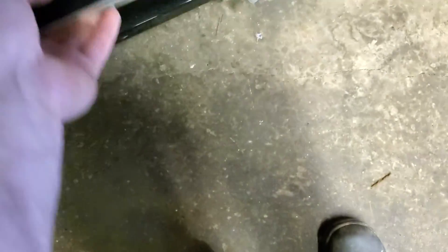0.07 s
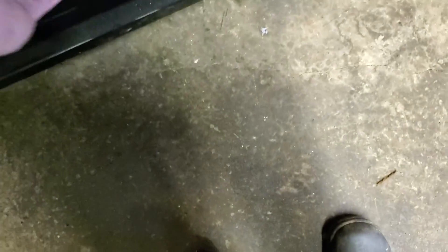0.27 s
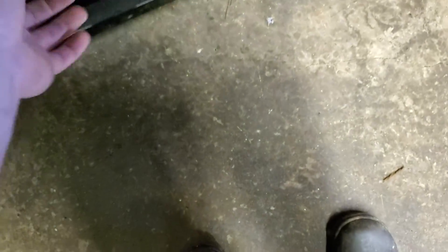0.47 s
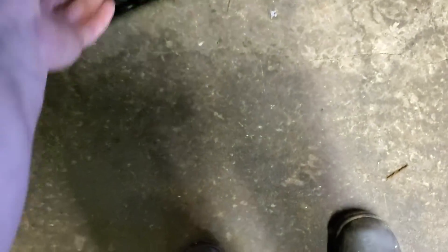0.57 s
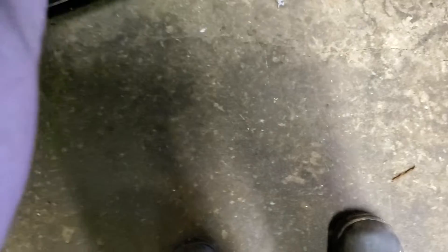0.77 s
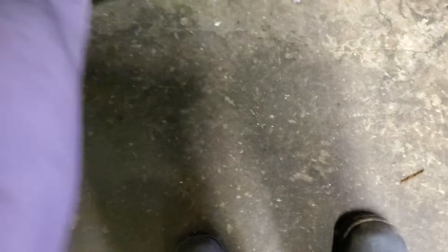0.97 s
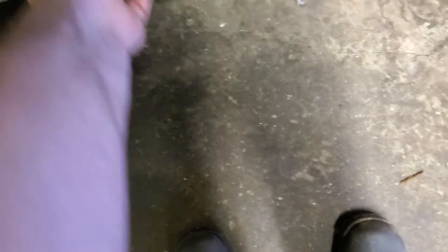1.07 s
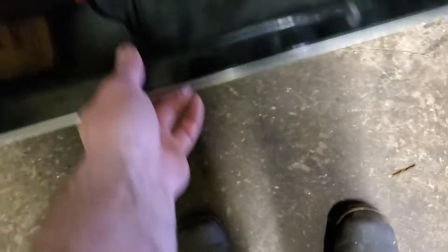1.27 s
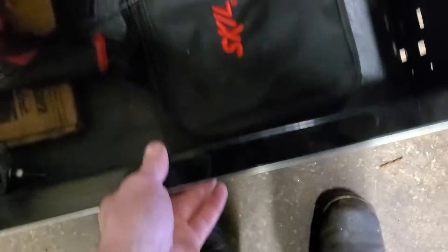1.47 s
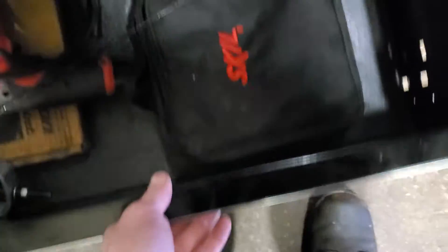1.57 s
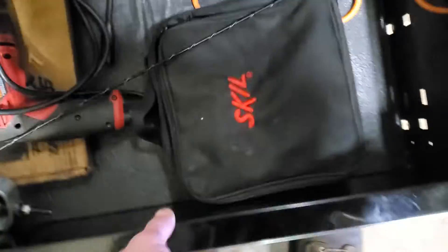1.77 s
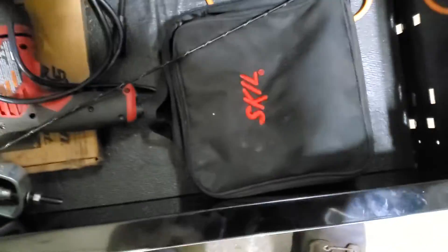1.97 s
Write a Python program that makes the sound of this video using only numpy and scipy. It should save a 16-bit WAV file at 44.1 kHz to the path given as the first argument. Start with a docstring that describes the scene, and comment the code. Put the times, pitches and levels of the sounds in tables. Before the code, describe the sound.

A steel tool cart drawer clicks and slams shut, leaving the panels booming. A handle rattles, then another drawer unlatches, rolls out and hits its stop with a clack, jostling tools. Heard close by in a garage.

```python
"""Steel drawers of a tool cart

Heard from close by in a garage, one drawer rolls in, trips its catch and slams home, leaving the
cabinet's panels booming. Another is unlatched, rolls out on ball-bearing slides and hits its stop with
a clack; the tools inside shift. Each impact excites damped modes of the steel: the distinct ones ring
as tones, the crowded ones merge into decaying noise, and the garage adds its reverberation."""
import sys
import numpy as np
from scipy import signal
from scipy.fft import rfft, irfft, next_fast_len
from scipy.io import wavfile

SR = 44100
rng = np.random.default_rng(int(sys.argv[2]) if len(sys.argv) > 2 else 0)


def dump(signal):
    """Clip the signal to [-1, 1] and save it as 16-bit WAV at the path in sys.argv[1]."""
    limited = np.clip(np.atleast_2d(signal).T, -1, 1)
    pcm = np.round(limited * 32767).astype(np.int16)
    wavfile.write(sys.argv[1], SR, pcm)


N = 89214
TIME = np.arange(N) / SR
BAND_HZ = 1000 * 2 ** (np.arange(-15, 13) / 3)
SECOND_DRAWER_S = 1.0

# Impacts of small steel parts: part, start_s, level_db, bass_db, mids_db, treble_db, attack_s, base_t60_s
CLICKS = [("rail", 0.081, -65.5, 10, -7.5, 9.5, .001, 0.045),
          ("catch", 0.2527, -27.5, 0.5, -0.8, -2.3, 0.0031, 0.14),
          ("bolt", 0.3219, -29.5, -1, 1, -1, 0.0033, 0.13),
          ("rail", 0.3285, -39.5, 0, 0, 13, 0.0011, 0.058), ("rail", 0.3540, -22.5, 4, -1, 0, 0.0015, 0.1),
          ("rail", 0.37, -37, 4, -11, 1, .002, 0.25), ("handle", 0.811, -50, -20, -10, -18, .006, .08),
          ("handle", 0.8227, -39.5, -21, -6.5, -4.5, 0.0022, 0.16),
          ("handle", 0.841, -37, -18, -5.5, -11.5, 0.003, 0.13),
          ("rail", 0.911, -61, -4, 9, 3, 0.0012, 0.049), ("rail", 1.328, -43, -10, 0, -13, 0.0025, 0.058),
          ("latch", 1.3925, -32, 7.8, -1.6, 5.1, 0.0053, 0.099),
          ("rail", 1.447, -50, -4, 7, -8, 0.0036, .12), ("rail", 1.678, -69, -10, -4, 11.5, 0.004, 0.044),
          ("rail", 1.693, -73, -1, -10, 18, .001, 0.024), ("rail", 1.822, -26, 15, 5, 3, 0.0026, 0.055),
          ("rail", 1.972, -53, -8, -10, 15.4, 0.014, 0.25),
          ("rail", 1.9985, -48.5, -8, -8, 20, .001, 0.023)]
# Impacts on the drawer boxes: start_s, level_db, bass_db, mids_db, treble_db, attack_s, base_t60_s
KNOCKS = [(0.125, -57, 14, -4, -17, 0.0017, 0.43), (0.3098, -30.5, -1, -6, -12, 0.0012, 0.17),
          (0.3629, -21, 1, -1.5, 1.5, 0.0027, 0.19), (0.392, -33, 7.5, -1, -1, 0.0018, 0.33),
          (0.424, -38.5, 8.5, 5, -6, .005, 0.22), (0.745, -55, 6.5, -2, -2, .003, 0.29),
          (1.141, -55.5, 15.5, -10, -15, 0.0089, 0.41), (1.285, -53, 7, -1, -16, 0.0013, 0.16),
          (1.406, -39.5, 10.5, -4, -8, 0.00087, 0.21), (1.8015, -23, -5.5, 2.5, -1, 0.0021, 0.17),
          (1.811, -31.5, 3, 5.5, -9, 0.0017, .1), (1.836, -32, 5, -1.5, -2, 0.0013, 0.58),
          (1.873, -32.5, 0, 0, -3.5, 0.0038, 0.45), (1.908, -41.5, 5, -5, -11, .004, 0.73),
          (1.977, -45, 14, 2.5, 6, 0.0016, 0.14)]
# Third-octave spectra of the slides and the garage: band_hz, rolling_db, hush_db, reverb_db
SPECTRA = [(25, -18, -58, -15), (39.7, -23, -64, -5), (64.3, -2.5, -52.5, 1.5), (106, 0.5, -52, -1.5),
           (196, -3.5, -50, -5.5), (405, 4, -58.5, -18), (677, 2, -57.5, -20.5), (1200, -2, -61, -22),
           (2240, -4.5, -60, -17), (3870, -8.5, -65, -20), (6460, -18, -74.5, -26.5),
           (10000, -17.5, -73, -29), (15000, -27, -79, -39)]
# Coherence of the left and right channels: frequency_hz, correlation
COHERENCE = [(60, 0.98), (150, 1), (380, 0.89), (950, 0.36), (2400, 0), (15000, 0.03)]


def clatter(bands):
    """Modal overlap: crowded modes merge into noise, which flutters as loose parts chatter."""
    # Dense ringing of the steel per third octave: band_hz, click_db, knock_db, t60_factor
    steel = [(25, -29, -21, 1.3), (50, -27, -16, 1.5), (107, -12.5, -10, 1), (164.8, -14.5, -10, 0.56),
             (244, -11.5, -6.5, 1), (433, -11.5, -4, 0.8), (780, -8, -3, 0.92), (1570, -5, -.5, 0.85),
             (3430, 2.5, -1.5, 1), (6300, -4, -4.5, 0.7), (10000, -0.5, -5.5, 0.83), (15000, -4, -4, 0.59)]
    chatter_db = 1.23 * flicker(hz=333.7)
    clicks = [blow for part, *blow in CLICKS]
    out = 0
    for hz, noise in zip(BAND_HZ, bands):
        click_db, knock_db, t60_factor = at_hz(steel, hz)
        reverb_db = at_hz(SPECTRA, hz)[2]
        power = band_power(clicks, hz, click_db, t60_factor, reverb_db)
        power += band_power(KNOCKS, hz, knock_db, t60_factor, reverb_db)
        out += np.sqrt(power) * noise
    shaking = sum(strike(start, attack, 2 * t60) for start, *_, attack, t60 in clicks + KNOCKS)
    return out * from_db(np.minimum(shaking, 1) * chatter_db)


def band_power(blows, hz, band_db, t60_factor, reverb_db):
    """Incoherent addition: the steel's ring and the garage's reverberation sum as powers."""
    power = np.zeros(N)
    reverb = (from_db(reverb_db) * strike(0, attack=0.0076, t60=0.8)) ** 2
    for start, db, *tone_db, attack, t60 in blows:
        first = int(start * SR)
        ring = strike(0, attack, t60 * t60_factor) ** 2
        tail = ring + reverb * t60 / 0.14   # a longer ring feeds the room more energy
        power[first:] += from_db(db + band_db + impact_colour(hz, *tone_db)) ** 2 * tail[:N - first]
    return power


def panels():
    """Flexural vibration: sheet steel booms; a hand reaching for the next drawer damps the first booms."""
    # Low modes of the broad panels: start_s, pitch_hz, level_db, attack_s, free_t60_s
    booms = [(0.313, 83, -25, 0.0077, 0.29), (0.36, 42.2, -22, 0.011, 0.22),
             (0.3676, 80.4, -5.5, 0.0079, 1.43), (0.38, 86.5, -15, 0.0078, 0.057),
             (0.752, 87.7, -22, 0.0055, 0.46), (0.98, 93.7, -39, 0.023, 0.89),
             (1.407, 263, -18.5, 0.0025, 0.076), (1.416, 98.5, -19.5, 0.0043, 0.27),
             (1.803, 63.5, -14, 0.019, 0.18), (1.835, 38.4, -24, 0.017, .3),
             (1.874, 106, -11.5, .012, 0.35), (1.882, 204.5, -19.5, 0.03, 0.44),
             (1.831, 301, -10, 0.005, 0.043), (1.948, 52, -27.5, 0.038, 0.36)]
    hand_damping = np.exp(-np.log(1000) * np.maximum(TIME - 0.78, 0) / 0.75)
    out = 0
    for start, hz, db, attack, t60 in booms:
        swing = from_db(db) * strike(start, attack, t60) * np.sin(2 * np.pi * hz * (TIME - start))
        out += swing * (hand_damping if start < SECOND_DRAWER_S else 1)
    return out


def drawer_boxes():
    """Free vibration: each knocked drawer rings at its own natural frequencies."""
    # Modes of the closing and of the opening drawer: pitch_hz, level_db, t60_s
    closing_modes = [(254.4, -5.5, 0.34), (362.3, -5.5, 0.23), (390.4, 1.5, 0.3), (451, -4, 0.25),
                     (490, -11, 0.38), (628, -4.5, 0.33), (707, -9.5, 0.29), (1438, -2.5, 0.12),
                     (1684, -5.5, .24), (1770, -3.5, 0.19), (2190, -3, 0.11)]
    opening_modes = [(325.8, -1.5, 0.18), (407, -3, 0.2), (918, 3, 0.13), (1142, -1, 0.22),
                     (1295, -4, 0.18), (1386, 4, 0.2), (1465, 5, 0.1), (1563, -2.5, 0.19), (1830, -5, .13),
                     (2045, -1, .11), (2230, 3, 0.1), (3190, -2, 0.21), (3493, -3, 0.15), (6626, -10, 0.2),
                     (7305, -10, 0.17)]
    closing = [knock for knock in KNOCKS if knock[0] < SECOND_DRAWER_S]
    opening = [knock for knock in KNOCKS if knock[0] >= SECOND_DRAWER_S]
    slam = modal_ring(with_rebounds(closing, count=5), closing_modes + minor_modes(), gain_db=-1)
    clack = modal_ring(with_rebounds(opening, count=5), opening_modes + minor_modes(), gain_db=-0.5)
    return slam + clack


def minor_modes(count=36):
    """Damping grows with frequency: of a drawer's weak, scattered modes the high ones die first."""
    octaves = rng.uniform(-1.5, 2.9, count)
    level_db = -13.5 - 0.5 * octaves
    t60_s = 0.21 * 2 ** (-.15 * octaves)
    return list(zip(1000 * 2 ** octaves, level_db, t60_s))


def locking_parts():
    """Impact excitation: small, stiff parts ring briefly at high natural frequencies."""
    # Modes of each part: pitch_hz, level_db, t60_s
    catch = [(1349, 0, .15), (2260, 2, .08), (2906, -2, .11), (3480, 1, .13), (3666, 2, .16), (4075, 3, .1),
             (4300, 2, .1)]
    bolt = [(726, 2.5, 0.15), (1020, 4, .12), (2201, 3, 0.087), (3499, 13, 0.089), (4446, 3, 0.093),
            (6939, -10, .06)]
    handle = [(945, 2, .15), (1916, 1, .15), (2100, 1, .17), (2400, 1, .14), (3203, 2.5, .12),
              (3692, 1.5, .14), (3950, -2, .17)]
    latch = [(1787, -3, 0.19), (2000, -0.5, 0.15), (2770, 0, .08), (2940, 0, .06), (4247, -5, .1),
             (6500, -7, .1), (6760, -6, .1)]
    out = 0
    for name, modes in dict(catch=catch, bolt=bolt, handle=handle, latch=latch).items():
        blows = [blow for part, *blow in CLICKS if part == name]
        out += modal_ring(blows, modes, gain_db=-1)
    return out


def loose_tool():
    """Free vibration: a small steel tool, jolted in the drawer, rings in the high treble."""
    # Jolts of the tool: start_s, level_db
    jolts = [(1.823, -45), (1.872, -50), (1.939, -47)]
    # Modes of the tool: pitch_hz, level_db, t60_s
    modes = [(8480, -10, .25), (14900, 7.5, 0.3), (14965, 4, .2), (15100, 4, 0.35), (15530, 1, .18)]
    blows = [(start, db, 0, 0, 0) for start, db in jolts]   # flat excitation spectrum
    return modal_ring(with_rebounds(blows, count=4), modes, gain_db=0)


def with_rebounds(blows, count, mean_delay_s=.035, loss_db=8, fade_db_per_s=101):
    """Inelastic collision: loose contents land again after each blow, the later the weaker."""
    impacts = list(blows)
    for start, db, *rest in blows:
        impacts += [(start + delay, db - loss_db - fade_db_per_s * delay, *rest)
                    for delay in rng.exponential(mean_delay_s, count) if start + delay < TIME[-1]]
    return impacts


def modal_ring(blows, modes, gain_db, spread_db=1.5):
    """Superposition: every blow kicks every damped mode; high modes differ in phase left and right."""
    out = np.zeros((2, N))
    starts, blow_db, *tone_db = np.transpose(blows)[:5]
    for hz, mode_db, t60 in modes:
        phase_gap = np.arccos(at_hz(COHERENCE, hz)[0]) * rng.choice([-1, 1])
        strength_db = blow_db + mode_db + gain_db + impact_colour(hz, *tone_db)
        strength_db += spread_db * rng.standard_normal(len(starts))
        phases = np.exp(2j * np.pi * rng.random(len(starts)))
        kicks = np.zeros(N, complex) + 1e-18
        kicks[(starts * SR).astype(int)] += from_db(strength_db) * phases
        pole = np.exp((2j * np.pi * hz - np.log(1000) / t60) / SR)
        swing = signal.lfilter([1], [1, -pole], kicks)
        out += np.imag(swing * np.exp(1j * phase_gap * np.array([[0], [1]])))
    return out


def impact_colour(hz, bass_db, mids_db, treble_db):
    """Excitation spectrum of a blow, in dB: a bass shelf, a midrange bell and a treble shelf."""
    bass = np.clip(np.log(1200 / hz) / np.log(4), 0, 1)
    mids = np.exp(-.5 * (np.log2(hz / 1530) / 0.61) ** 2)
    treble = np.clip(np.log(hz / 3000) / np.log(4), 0, 1)
    return bass_db * bass + mids_db * mids + treble_db * treble


def slides(bands):
    """Rolling contact: ball bearings rumble unevenly along the rails."""
    # Envelope of the rolling: time_s, level_db
    rolling = [(0, -56.5), (.13, -57.5), (.24, -54.5), (.34, -57), (.45, -57), (.95, -65), (1.1, -66.5),
               (1.18, -57), (1.27, -52.5), (1.33, -43), (1.385, -49), (1.5, -56), (1.65, -65.5),
               (1.79, -57.5), (2.02, -49.5)]
    roughness_db = 2.5 * flicker(hz=70.17)
    level_db = np.interp(TIME, *np.transpose(rolling)) + roughness_db
    rumble = sum(from_db(at_hz(SPECTRA, hz)[0]) * noise for hz, noise in zip(BAND_HZ, bands))
    return from_db(level_db) * rumble


def garage_hush(bands):
    """Stationary noise: the garage's background keeps a constant spectrum."""
    return sum(from_db(at_hz(SPECTRA, hz)[1]) * noise for hz, noise in zip(BAND_HZ, bands))


def band_noise(hz):
    """Partial coherence: a third octave of stereo noise, alike on both sides in the bass."""
    edges = hz * 2 ** (np.array([-1, 1]) / 6)
    bandpass = signal.butter(2, edges, "band", fs=SR, output="sos")
    noise = signal.sosfilt(bandpass, rng.standard_normal((2, N + SR // 4)))[:, -N:]
    mid, side = noise / noise.std(axis=1, keepdims=True)
    correlation = at_hz(COHERENCE, hz)[0]
    return np.sqrt((1 + correlation) / 2) * mid + np.sqrt((1 - correlation) / 2) * side * [[1], [-1]]


def strike(start, attack, t60):
    """Exponential decay after a linear rise: the envelope of a blow."""
    age = np.maximum(TIME - start, 0)
    return np.minimum(age / attack, 1) * np.exp(-np.log(1000) * np.maximum(age - attack, 0) / t60)


def flicker(hz):
    """Random modulation of unit variance, gliding to a new value hz times a second."""
    curve = np.interp(TIME * hz, np.arange(N), rng.standard_normal(N))
    return curve / curve.std()


def at_hz(table, hz):
    """A table's columns, interpolated along a logarithmic frequency axis."""
    table_hz, *columns = np.transpose(table)
    return [np.interp(np.log(hz), np.log(table_hz), column) for column in columns]


def from_db(db):
    """Decibels to amplitude ratio."""
    return 10 ** (np.asarray(db) / 20)


def scene():
    """Superposition of all sources; a level difference places the drawers between left and right."""
    # Position of the drawers: time_s, left_minus_right_db
    place = [(.25, 1.5), (.85, -0.5), (1.4, 0), (1.8, -1)]
    pan = from_db(np.interp(TIME, *np.transpose(place)) * [[.5], [-.5]])
    impacts = clatter([band_noise(hz) for hz in BAND_HZ])
    rolling = slides([band_noise(hz) for hz in BAND_HZ])
    hush = garage_hush([band_noise(hz) for hz in BAND_HZ])
    tones = locking_parts() + drawer_boxes() + loose_tool()
    return pan * (impacts + rolling + tones) + panels() + hush


def record(dry):
    """Filtering and saturation: two microphone ports colour the treble, peaks round off, the top is cut."""
    # Frequency response of the ports: frequency_hz, left_db, right_db
    ports = [(101, -1, -2.5), (615, .5, -1.5), (1550, -2, 1), (3850, 0.5, 2), (5410, 0.5, 1),
             (6430, 5, 10.5), (7160, 2, 11), (7840, -4, -2), (10400, -2, -4), (10900, -1, 2),
             (12280, 0, 11.5), (13260, 7.5, 10), (14300, -8, 3), (15600, 7, -4)]
    size = next_fast_len(N + SR // 10)
    hz = np.maximum(np.fft.rfftfreq(size, 1 / SR), 1)
    coloured = irfft(rfft(dry, size) * from_db(at_hz(ports, hz)), size)[:, :N]
    rounded = coloured / (1 + coloured ** 6) ** (1 / 6)
    lowpass = signal.ellip(10, .2, 80, 15800, fs=SR, output="sos")
    return signal.sosfilt(lowpass, rounded)


dry = scene()
out = record(dry)
dump(out)
```